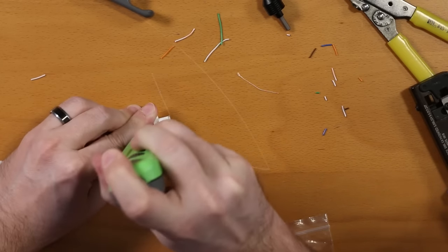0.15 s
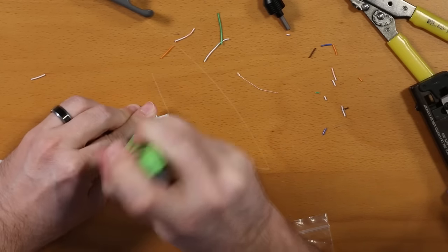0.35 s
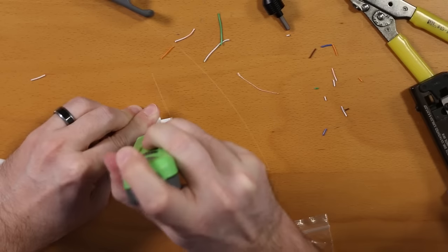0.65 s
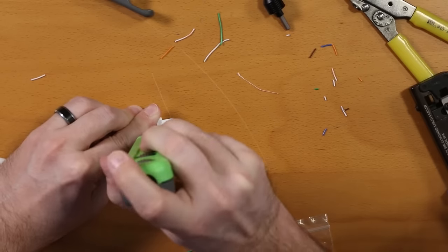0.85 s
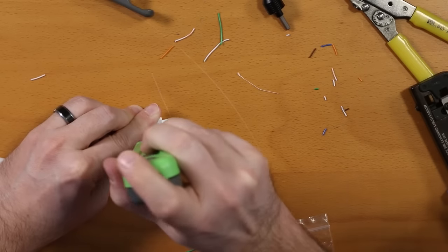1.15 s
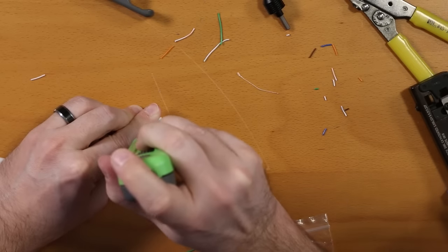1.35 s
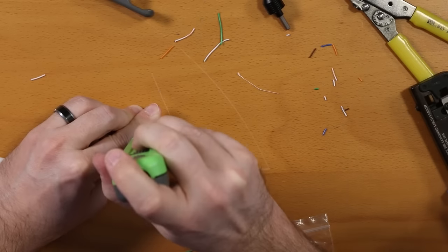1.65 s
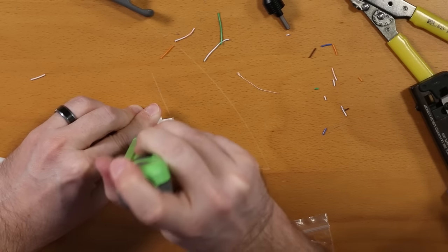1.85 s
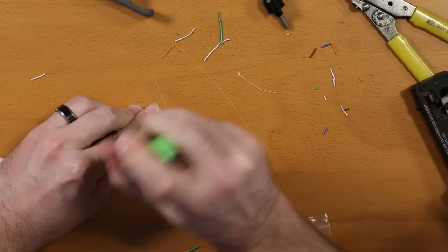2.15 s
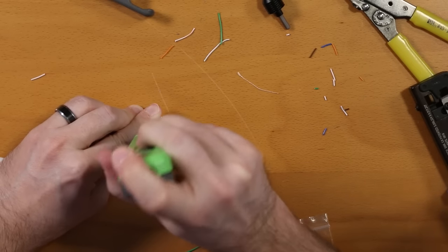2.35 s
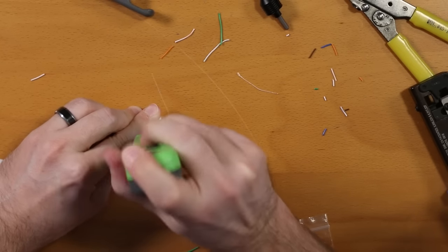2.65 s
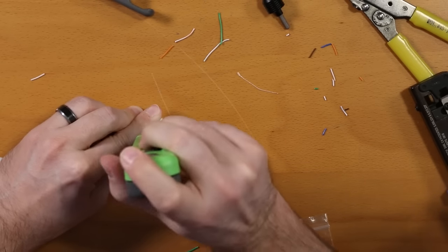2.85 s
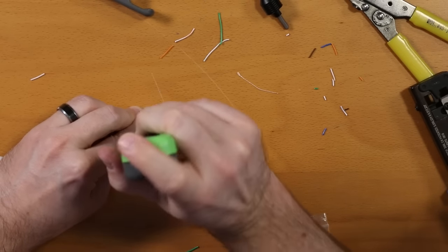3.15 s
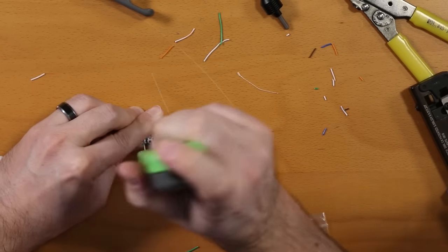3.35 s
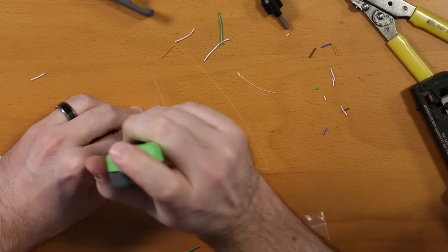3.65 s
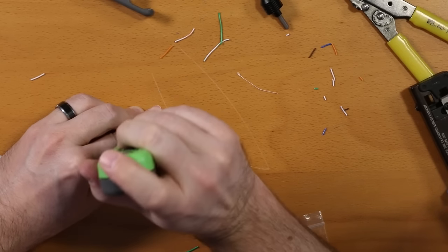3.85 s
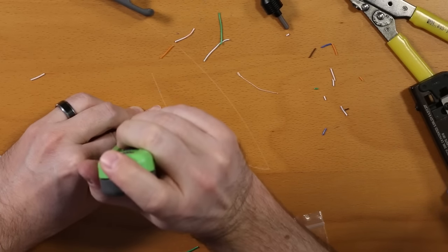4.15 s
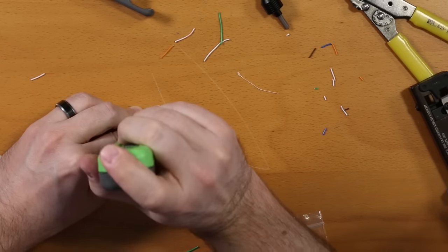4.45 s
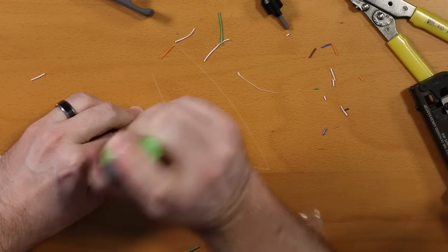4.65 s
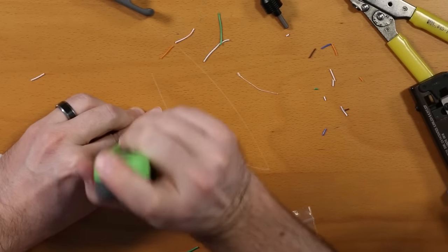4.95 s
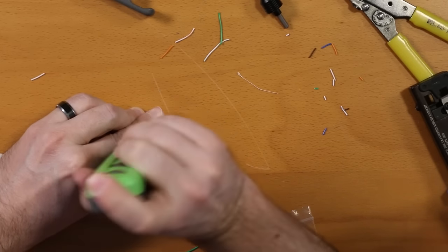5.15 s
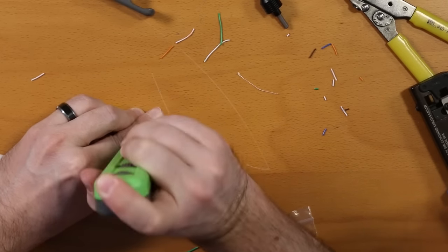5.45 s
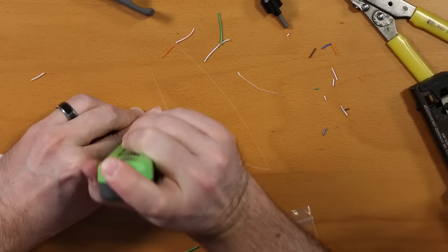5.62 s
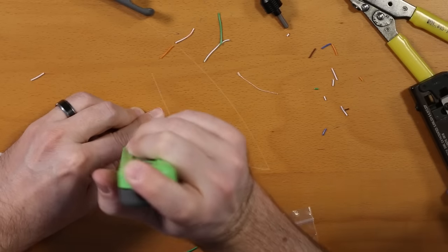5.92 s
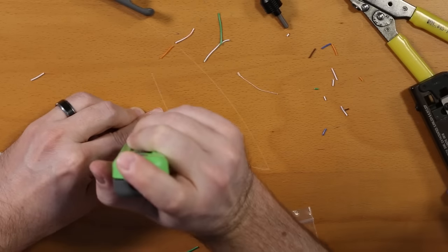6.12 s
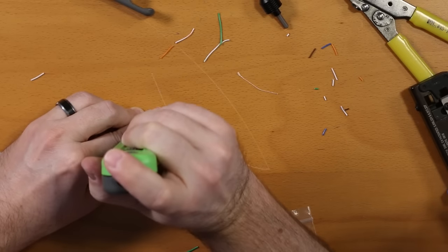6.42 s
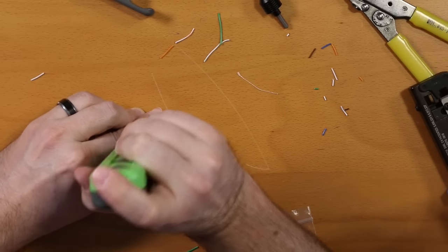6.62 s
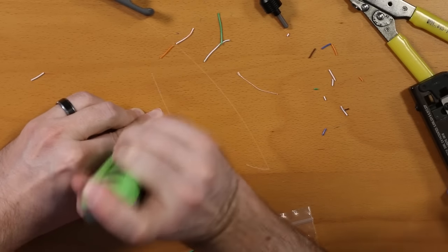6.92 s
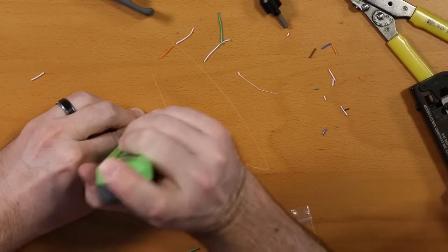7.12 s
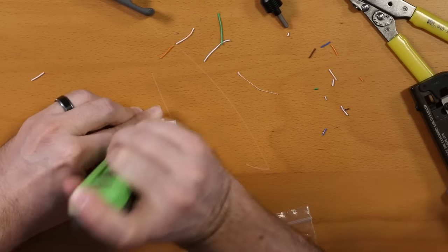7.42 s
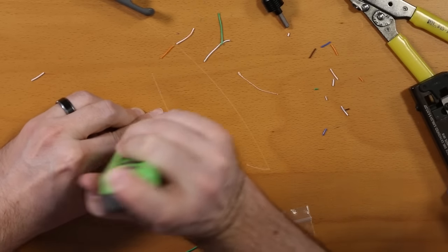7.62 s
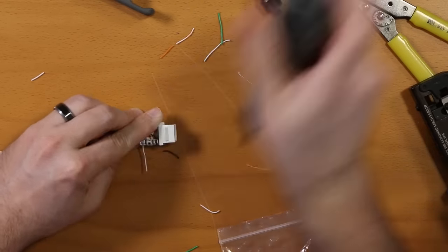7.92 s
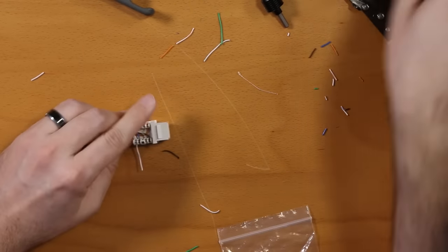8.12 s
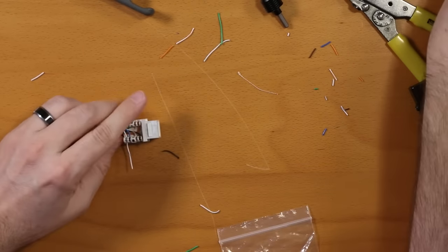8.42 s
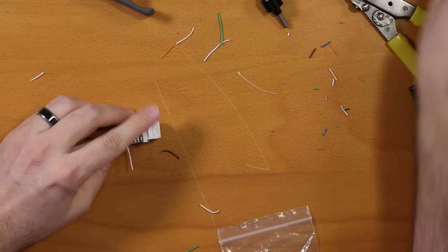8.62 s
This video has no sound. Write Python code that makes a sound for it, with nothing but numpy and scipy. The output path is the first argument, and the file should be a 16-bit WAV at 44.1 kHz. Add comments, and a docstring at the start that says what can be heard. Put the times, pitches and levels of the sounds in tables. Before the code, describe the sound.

Over a steady low hum in a small room, seven hard snaps come from a punch-down tool pressing on a plastic jack, three first and four more after a pause. They are close enough to distort, and each is followed by a springy return click. Faint blade ticks and dull knocks on the wooden bench fill the gaps. Finally the tool clatters down, leaving a faint ring and a tiny scuff.

```python
"""A low hum runs throughout in a small room. On a wooden workbench, the blade of a spring-loaded punch-down
tool ticks on a network jack. Its hammer fires: the impact cracks, sets the bench ringing and overloads
the close microphone. About a fifth of a second later the plunger slides back and clicks home. Seven
snaps seat seven wires, with light ticks and knocks in between. At last the tool is put down and rocks
to rest, something on the bench rings on, and the jack scuffs faintly over the wood."""
import sys
import numpy as np
from scipy import signal
from scipy.fft import rfft, irfft
from scipy.io import wavfile

SR = 44100
rng = np.random.default_rng(int(sys.argv[2]) if len(sys.argv) > 2 else 0)


def generate_wav(sig):
    """Save sig (samples, or channels by samples) to the path in sys.argv[1] as 16-bit PCM at SR."""
    pcm = np.round(np.clip(np.atleast_2d(sig).T, -1, 1) * 32767).astype(np.int16)
    wavfile.write(sys.argv[1], SR, pcm)


N = 387198
TIME = np.arange(N) / SR
SIDES = np.array([[1], [-1]])  # left, right


def from_db(db):
    """Amplitude grows tenfold for every 20 dB."""
    return 10 ** (np.asarray(db) / 20)


def unit_rms(x):
    """Normalisation to a mean power of one."""
    return x / np.sqrt(np.mean(x ** 2) + 1e-20)


def at_hz(points, hz):
    """Interpolation of a table on a logarithmic frequency axis."""
    known_hz, value = np.transpose(points)
    return np.interp(np.log(np.maximum(hz, 1)), np.log(known_hz), value)


def add(track, s, sound):
    """Superposition: a sound adds to the track from time s."""
    start = max(round(s * SR), 0)
    track[start:start + len(sound)] += sound[:N - start]


def through(x, response):
    """Convolution of a mono track with a stereo impulse response."""
    return signal.fftconvolve(x[None], response, axes=1)[:, :N]


def coloured(x, colour, tilt_db=0, size=4096):
    """Minimum-phase, hence causal, filtering; the tilt per octave acts above 1 kHz and pivots at 5 kHz."""
    hz = np.fft.rfftfreq(size, 1 / SR)
    octaves = np.log2(np.maximum(hz, 1000) / 5000)
    gain = from_db(at_hz(colour, hz) + tilt_db * octaves)
    cepstrum = irfft(np.log(gain))
    cepstrum[1:size // 2] *= 2
    return irfft(rfft(x, size) * np.exp(rfft(cepstrum[:size // 2], size)))


def resonance(x, hz, width_hz):
    """A damped two-pole resonator with unit gain at its peak."""
    radius = np.exp(-np.pi * width_hz / SR)
    feedback = [1, -2 * radius * np.cos(2 * np.pi * hz / SR), radius ** 2]
    return signal.lfilter(np.array([1, 0, -1]) * (1 - radius ** 2) / 2, feedback, x)


def drift(rate_hz):
    """Slow random modulation: straight lines between Gaussian values."""
    knots = rng.standard_normal(1024)
    return np.interp(TIME * rate_hz, np.arange(len(knots)), knots)


# Likeness of left and right in the room's sound field: (frequency [Hz], coherence [0-1])
COHERENCE = [(40, .45), (90, 0), (300, 0.36), (1000, 0.74), (2700, 0.64), (4500, 0.36), (6200, 0.23),
             (7800, 0.098), (9800, 0.55), (12500, .5), (15000, 0.076)]

def diffuse_noise(spectrum, size):
    """A diffuse field: noise from all directions is only partly coherent at two microphones."""
    hz = np.fft.rfftfreq(size, 1 / SR)
    coherence = np.clip(at_hz(COHERENCE, hz), -1, 1)
    mid, side = rfft(rng.standard_normal((2, size)))
    stereo = np.sqrt((1 + coherence) / 2) * mid + np.sqrt((1 - coherence) / 2) * side * SIDES
    return irfft(stereo * from_db(at_hz(spectrum, hz)), size)


# Steady background noise: (frequency [Hz], relative spectral density [dB])
AIR_SPECTRUM = [(20, -24.5), (35, -22.5), (55, -20), (110, -27), (200, -37), (265, -27.5), (350, -37.5),
                (550, -41), (800, -41), (1300, -49.5), (2000, -52.5), (3200, -59), (7000, -65),
                (15800, -73)]

def room_air(level_db):
    """Stationary diffuse noise, strongest in the bass, forms the noise floor."""
    return from_db(level_db) * unit_rms(diffuse_noise(AIR_SPECTRUM, N))


# Close tones of the hum: (frequency [Hz], relative level [dB])
HUM_PARTIALS = [(58.8, -5), (64.9, -10.5), (73.8, -5.5), (76, 0.5), (90, -17.5)]
# Rumble around the tones: (frequency [Hz], relative spectral density [dB])
RUMBLE_SPECTRUM = [(20, -25.5), (45, -12.5), (62, 0.5), (76, -1.5), (86, -11), (100, -22.5), (200, -52),
                   (600, -92.5)]
# Swelling and sinking of both: (time [s], relative level [dB])
HUM_ENVELOPE = [(0.0, -37), (0.29, -34.5), (1.0, -41), (1.2, -37.5), (1.49, -49), (1.93, -41),
                (2.74, -44.5), (3.18, -54.5), (4.45, -52), (4.7, -38.5), (7.55, -38.5), (8.78, -42.5)]

def hum(tone_db, rumble_db, pan_db, waver_rad, side_rad):
    """Beating: close, wavering tones interfere and throb, under one envelope with the rumble."""
    tones = 0
    for hz, db in HUM_PARTIALS:
        phase = rng.uniform(0, 2 * np.pi) + waver_rad * drift(1.2) + side_rad * drift(2.5) * SIDES
        tones = tones + from_db(db) * np.sqrt(2) * np.sin(2 * np.pi * hz * TIME + phase)
    rumble = unit_rms(diffuse_noise(RUMBLE_SPECTRUM, N))
    s, swell_db = np.transpose(HUM_ENVELOPE)
    envelope = from_db(np.interp(TIME, s, swell_db) + pan_db * SIDES)
    return envelope * (from_db(tone_db) * tones + from_db(rumble_db) * rumble)


# Decay of the room: (frequency [Hz], reverberation time T60 [s])
REVERB_TIMES = [(100, 0.06), (350, 0.51), (1000, 0.46), (3000, 0.44), (7000, 0.43), (14000, 0.25)]
# Reflected sound: (frequency [Hz], relative level [dB])
REFLECTION_SPECTRUM = [(100, -0.5), (350, -6.5), (700, -6.5), (1200, -7), (3000, -9.5), (7000, -8.5),
                       (14000, -9)]

def room_response(build_s, early_db, early_t60, late_db, near_db, near_s, size=32768):
    """Reverberation: direct sound, near scatter, early reflections and a tail that decays by band."""
    t = np.arange(size) / SR
    hz, frame_s, frames = signal.stft(diffuse_noise(REFLECTION_SPECTRUM, size), SR, nperseg=256)
    early = from_db(early_db - 60 * frame_s / early_t60)
    late = from_db(late_db - 60 * frame_s / at_hz(REVERB_TIMES, hz)[:, None])
    build_up = np.minimum(t / build_s, 1) ** 2
    walls = signal.istft(frames * (early + late), SR)[1][:, :size] * build_up
    near = from_db(near_db) * diffuse_noise(REFLECTION_SPECTRUM, size) * np.exp(-t / near_s)
    scatter = near - near[::-1]  # opposite in sign on left and right
    return (t == 0) + scatter + walls


# Modes of the bench and what stands on it: (frequency [Hz], relative level [dB], decay time T60 [s])
BENCH_MODES = [(28.68, -27.5, 0.99), (41, -14.5, 0.76), (65, -19.5, 0.2), (98, -16, 0.099),
               (121, -14, 0.24), (142.7, -4.5, .42), (161.6, -14.5, 0.5), (234, -13.5, .25),
               (266, -13, .35), (301, -10, 0.42), (315.8, -5.5, 0.33), (336.3, -12.5, .28),
               (366, -22, 0.15), (456.4, -12, 0.44), (444, -12.5, 0.22), (560, -18.5, .28),
               (640, -21.5, 0.36), (708, -20.5, 0.38), (821, -19, .28), (858, -13, 0.079), (966, -23, 0.12)]

def bench_response(lag_300hz_s, spread_db, side_rad, size=44100):
    """Modal ringing with dispersion: low bending waves travel slower, so their phase delay is longer."""
    t, out = np.arange(size) / SR, 0
    for hz, db, t60 in BENCH_MODES:
        level, phase = rng.standard_normal((2, 1, 1)) * SIDES  # each side hears the mode its own way
        lag_s = lag_300hz_s * np.sqrt(300 / hz)
        ring = np.sin(2 * np.pi * hz * (t - lag_s) + side_rad * phase) * from_db(-60 * t / t60)
        out = out + from_db(db + spread_db * level) * ring
    return out * np.minimum(t / 0.0031, 1)


def burst(hold_s, decay_s, evenness, size=2048):
    """Hard contact is broadband: a rattle rises, holds and decays; evenness 1 flattens its spectrum."""
    t = np.arange(size) / SR
    envelope = np.minimum(t / 0.0002, 1) * np.exp(-np.maximum(t - hold_s, 0) / decay_s)
    rattle = rng.standard_normal(size) * envelope
    for _ in range(2):
        spectrum = rfft(rattle)
        flattened = spectrum / (np.abs(spectrum) + 1e-9) ** evenness
        rattle = irfft(flattened) * np.sqrt(envelope)
    return unit_rms(rattle) * np.sqrt(np.mean(envelope ** 2))


def impacts(rows, colour, gain_db, hold_s, decay_s, lead_s, evenness, ring_db, ring_width_hz):
    """Impact excitation: each collision gives a coloured burst and a short ring of the struck part."""
    out = np.zeros(N)
    for s, db, _, tilt_db, ring_hz in rows:
        crack = coloured(burst(hold_s, decay_s, evenness), colour, tilt_db)
        ring = from_db(ring_db) * resonance(crack, ring_hz, ring_width_hz)
        add(out, s - lead_s, from_db(db + gain_db) * (crack + ring))
    return out


def pulses(rows, gain_db, width_s, lead_s, size=512):
    """Momentum transfer: each blow is one smooth pulse; the shorter it is, the wider its spectrum."""
    out, t = np.zeros(N), np.arange(size) / SR
    pulse = np.sin(np.pi * np.minimum(t / width_s, 1)) ** 2
    for s, db, thump_db, *_ in rows:
        add(out, s - lead_s, -from_db(db + thump_db + gain_db) * pulse / pulse.sum())
    return out


def jack_scuff(start_s, length_s, level_db, hz, width_hz):
    """Sliding friction: the fingers turn the plastic jack on the wood, giving a stroke of band noise."""
    stroke = np.sin(np.pi * np.clip((TIME - start_s) / length_s, 0, 1))
    friction = resonance(resonance(rng.standard_normal(N), hz, width_hz), hz, width_hz)
    return from_db(level_db) * stroke * unit_rms(friction)


# Blade and wire on the jack: (time [s], relative level [dB], treble tilt [dB/octave], ring [Hz])
BLADE_TICKS = [(0.0424, -26.5, -1.5, 2200), (0.6845, -38.5, -5.5, 6800), (1.2211, -37.5, -3, 1940),
               (1.2925, -36.5, -1, 9700), (1.5355, -27, -2, 3380), (2.143, -27, -3.5, 3080),
               (2.9765, -33, -4.5, 5600), (3.5107, -32, 0, 3100), (3.8534, -38, -0.5, 2060),
               (3.9916, -43.5, -1, 4200), (4.2419, -34.5, -1, 3260), (4.8733, -27.5, -6, 3100),
               (6.1088, -39, -2.5, 10000), (6.3624, -36, -4, 2880), (7.0038, -31.5, -4, 3300),
               (7.1227, -38, -5.5, 5500), (7.8183, -44.5, -6, 4300)]
# Colour of a tick: (frequency [Hz], gain [dB])
TICK_SPECTRUM = [(60, 8.5), (400, 6), (800, -16), (1500, -8), (2200, -6.5), (2800, -10.5), (4200, -6),
                 (6500, -5.5), (10000, -13.5), (15500, -13)]

def blade_ticks():
    """Light impacts excite a narrow resonance and nudge the bench; gives sound and force."""
    rows = [(s, db, 0, tilt_db, ring_hz) for s, db, tilt_db, ring_hz in BLADE_TICKS]
    sound = impacts(rows, TICK_SPECTRUM, gain_db=4, hold_s=0.0006, decay_s=0.003, lead_s=0.0005,
                    evenness=0.25, ring_db=5, ring_width_hz=360)
    return sound, pulses(rows, gain_db=-7, width_s=0.00077, lead_s=0.0012)


# Jack and tool handle on the wood; in the last three rows the tool is put down, rocks and settles:
# (time [s], relative level [dB], body note [Hz], treble tilt [dB/octave])
WOOD_KNOCKS = [(1.525, -25, 321.6, -4), (1.556, -23.5, 432.6, -3), (2.975, -46, 417, -6),
               (3.51, -25, 121, -0.5), (3.584, -35, 330, -3), (4.423, -36.5, 161, -4),
               (6.047, -36, 444, -4), (8.368, -4.5, 392, -1.5), (8.392, -13.5, 320, -2.5),
               (8.422, -16.5, 140, -3.5)]
# Colour of a knock: (frequency [Hz], gain [dB])
KNOCK_SPECTRUM = [(50, -12.5), (150, -4), (300, -1.5), (460, 0), (650, -10.5), (1200, -11), (2500, -18),
                  (7000, -22), (11000, -32), (15500, -39.5)]

def knocks(gain_db, hold_s, decay_s, body_db, body_width_hz):
    """Body resonance: the dull chatter of plastic on wood excites a hollow note."""
    out = np.zeros(N)
    for s, db, hz, tilt_db in WOOD_KNOCKS:
        contact = burst(hold_s, decay_s, evenness=0.6, size=4096)
        chatter = coloured(contact, KNOCK_SPECTRUM, tilt_db)
        note = from_db(body_db) * resonance(resonance(contact, hz, body_width_hz), hz, body_width_hz)
        add(out, s - 0.001, from_db(db + gain_db) * (chatter + note))
    return out


def after_ring(hz, level_db, t60):
    """Free vibration: something on the bench rings on after the last knock, decaying exponentially."""
    age = np.maximum(TIME - WOOD_KNOCKS[-1][0], 0)
    return from_db(level_db - 60 * age / t60) * np.sin(2 * np.pi * hz * age)


# The plunger clicks home: (time [s], relative level [dB], thump offset [dB])
PLUNGER_RETURNS = [(0.4144, -16.5, -26), (2.0, -16, -7.5), (2.4749, -17, -17), (4.7484, -14, -13.5),
                   (5.4601, -14, -14), (6.8411, -17, -5.5), (7.3806, -16.5, -3)]
# Colour of a return click: (frequency [Hz], gain [dB])
CLICK_SPECTRUM = [(60, 6.5), (400, 15), (750, -4), (1300, -2.5), (2100, -2), (2800, -8.5), (4000, -6.5),
                  (5200, -4.5), (7500, -7), (10000, -12), (15500, -19.5)]

def plunger_clicks(tilt_db, ring_hz):
    """Restoring force: one spring drives every return, so all share a colour; gives sound and force."""
    rows = [(s, db, thump_db, tilt_db, ring_hz) for s, db, thump_db in PLUNGER_RETURNS]
    sound = impacts(rows, CLICK_SPECTRUM, gain_db=4, hold_s=0.0012, decay_s=0.0018, lead_s=0.00043,
                    evenness=0.5, ring_db=1, ring_width_hz=700)
    return sound, pulses(rows, gain_db=-8, width_s=0.0024, lead_s=0.0019)


# Colour of the spring's scrape: (frequency [Hz], gain [dB])
SLIDE_SPECTRUM = [(200, -11.5), (900, -3), (1700, 3.5), (2130, 15), (2600, -7.5), (5000, -6.5), (8000, -10),
                  (15500, -22.5)]

def plunger_slides(gain_db, length_s, size=2048):
    """Friction noise: the spring scrapes in the barrel, swelling up to each return click."""
    out, t = np.zeros(N), np.arange(size) / SR
    swell = np.minimum(2 * t / length_s, 1) * (t < length_s)
    for s, *_ in PLUNGER_RETURNS:
        scrape = coloured(rng.standard_normal(size) * swell, SLIDE_SPECTRUM)
        add(out, s - length_s, from_db(gain_db) * scrape)
    return out


# The hammer fires: (time [s], relative level [dB], thump offset [dB], treble tilt [dB/octave], ring [Hz])
HAMMER_SNAPS = [(0.184, -2, -15, -0.5, 7350), (1.76, -1.5, -13, 0.5, 3630),
                (2.2786, -1.5, -14.5, -0.5, 3350), (4.5244, -6, -12.5, -2, 2320),
                (5.2237, -1.5, -12.5, 0.0, 2250), (6.6365, -2.5, -13, 0.0, 4100),
                (7.1594, -2.5, -15.5, 0, 6180)]
# Colour of a snap: (frequency [Hz], gain [dB])
SNAP_SPECTRUM = [(60, -5), (400, 6), (750, -3.5), (1200, -5.5), (1700, -5), (2220, -2), (2650, -8.5),
                 (3600, 0.5), (5200, -3), (7000, -0.5), (10000, -6), (15500, -16.5)]

def hammer_snaps():
    """Stored spring energy is released in one impact: a crack, a force on the bench and a thump."""
    crack = impacts(HAMMER_SNAPS, SNAP_SPECTRUM, gain_db=10.5, hold_s=0.0024, decay_s=0.001,
                    lead_s=0.00044, evenness=0.9, ring_db=-8.5, ring_width_hz=850)
    force = pulses(HAMMER_SNAPS, gain_db=8, width_s=0.00028, lead_s=0.00084)
    # the bench top, shoved bodily, radiates one low pulse of pressure
    thump = pulses(HAMMER_SNAPS, gain_db=45, width_s=0.0024, lead_s=0.0019)
    return crack, force, thump


def scene():
    """Airborne and structure-borne paths add: contacts excite the room, their forces ring the bench."""
    room = room_response(build_s=0.0036, early_db=-25.5, early_t60=0.16, late_db=-29.5,
                         near_db=-13, near_s=0.0009)
    bench = bench_response(lag_300hz_s=0.016132, spread_db=1.5, side_rad=0.037)
    snaps, snap_force, thump = hammer_snaps()
    clicks, click_force = plunger_clicks(tilt_db=0.7, ring_hz=5000)
    ticks, tick_force = blade_ticks()
    slides = plunger_slides(gain_db=-36.5, length_s=0.023)
    scuff = jack_scuff(start_s=8.70, length_s=0.034, level_db=-53.5, hz=1397, width_hz=1000)
    wood = knocks(gain_db=-0.5, hold_s=0.0067, decay_s=0.0085, body_db=5.5, body_width_hz=150)
    airborne = through(snaps + clicks + ticks + slides + scuff + wood, room)
    structure_borne = through(snap_force + click_force + tick_force, bench) + thump
    ring = after_ring(hz=474, level_db=-39, t60=0.98)
    air = room_air(level_db=-48)
    low_hum = hum(tone_db=1.5, rumble_db=-7.5, pan_db=1.5, waver_rad=0.23, side_rad=1.0)
    lean_left = from_db(1.0 * SIDES)
    return low_hum + (air + airborne + structure_borne + ring) * lean_left


def record(dry):
    """Overload: the snaps clip hard at full scale, then a steep low-pass removes the highest treble."""
    low_pass = signal.ellip(10, 0.1, 70, 15900, fs=SR, output="sos")
    return signal.sosfilt(low_pass, np.clip(dry, -1, 1))


dry = scene()
out = record(dry)
generate_wav(out)
```